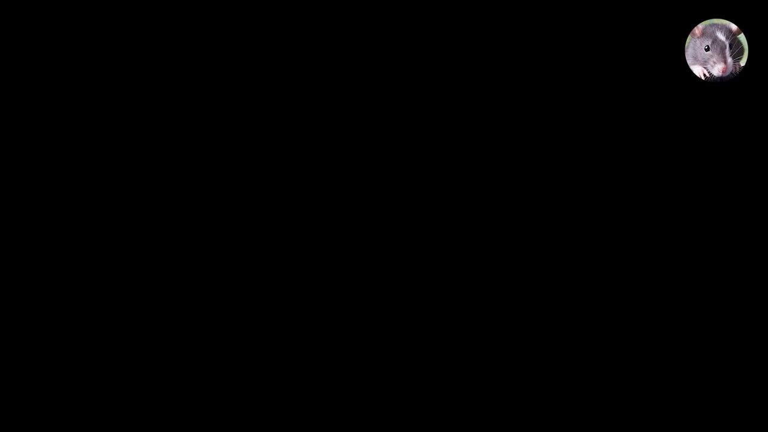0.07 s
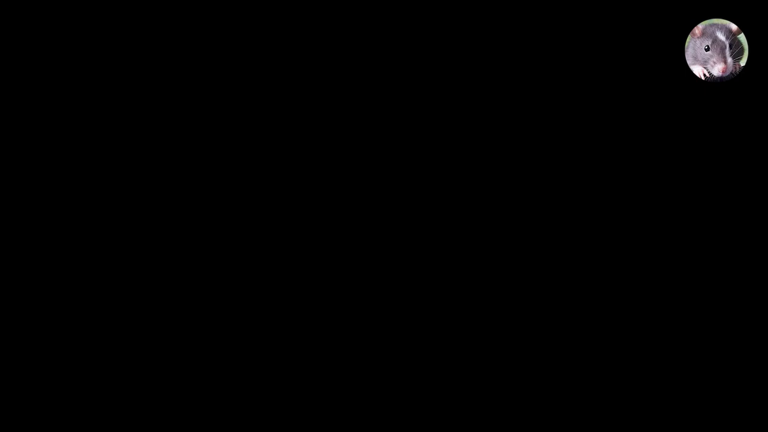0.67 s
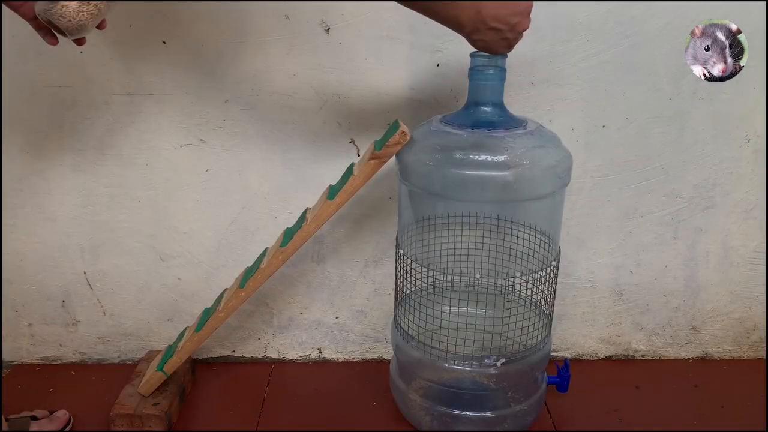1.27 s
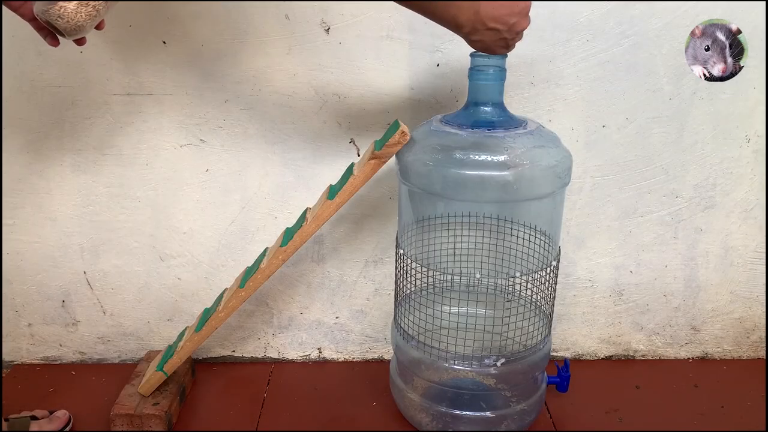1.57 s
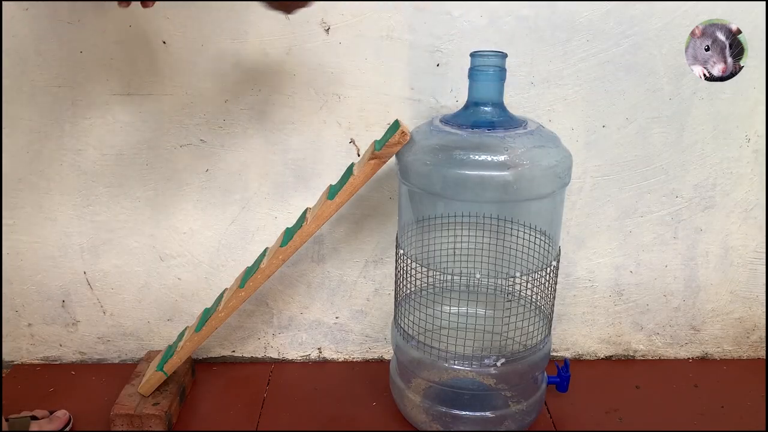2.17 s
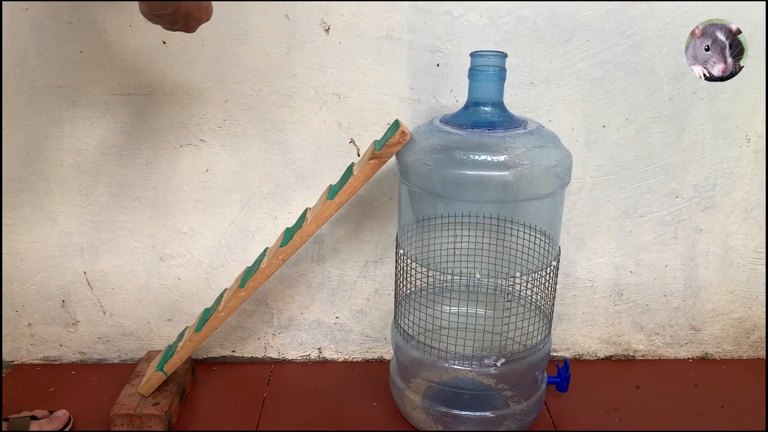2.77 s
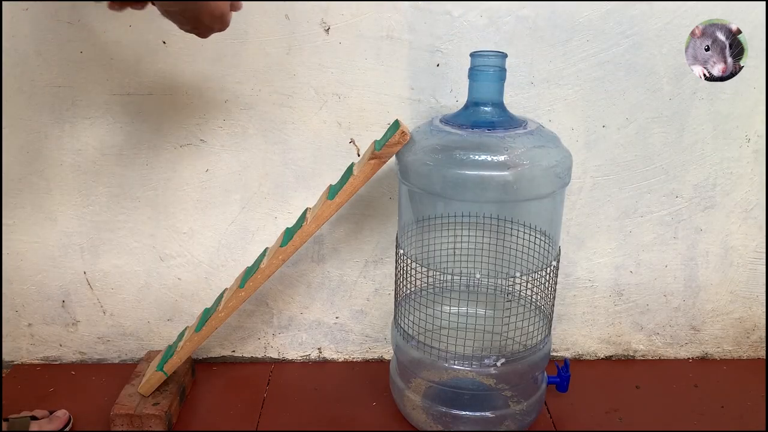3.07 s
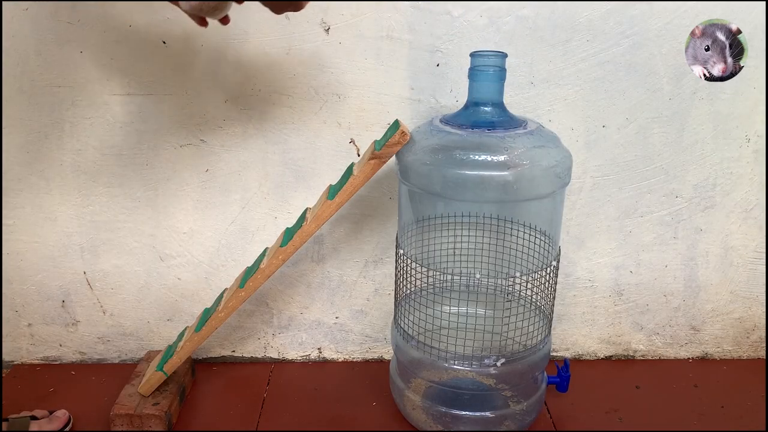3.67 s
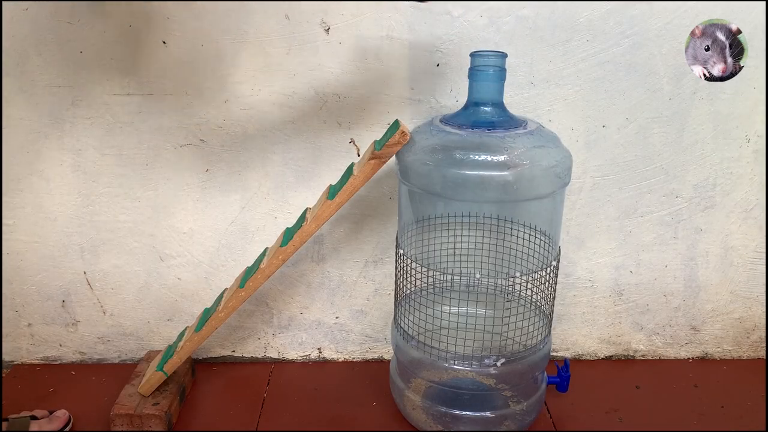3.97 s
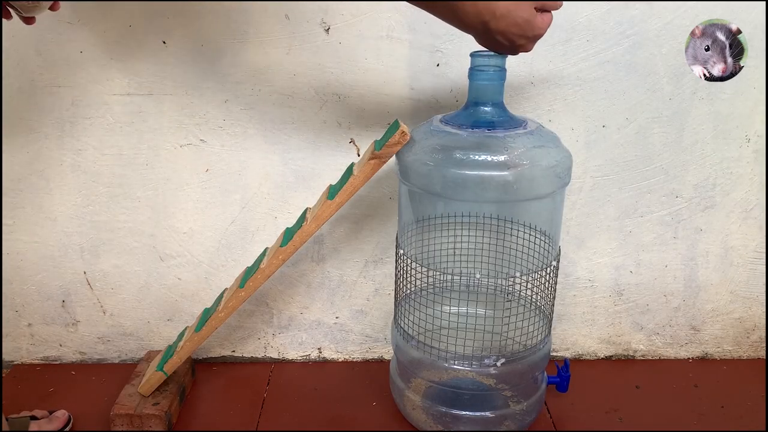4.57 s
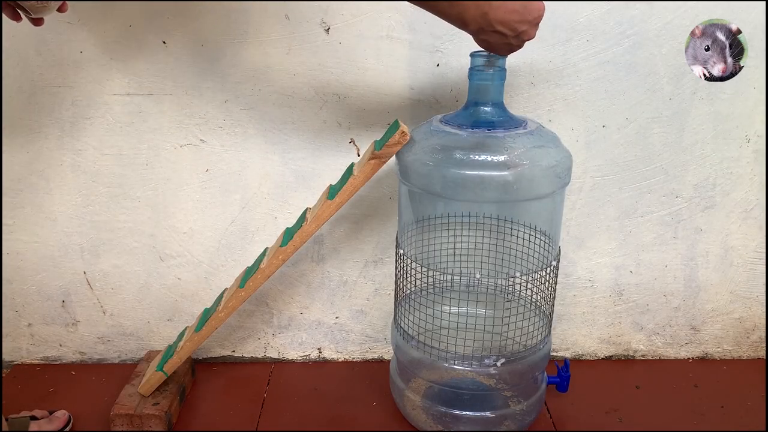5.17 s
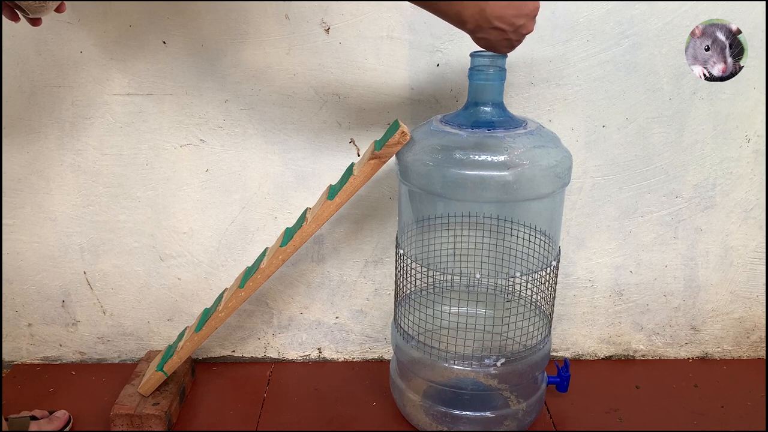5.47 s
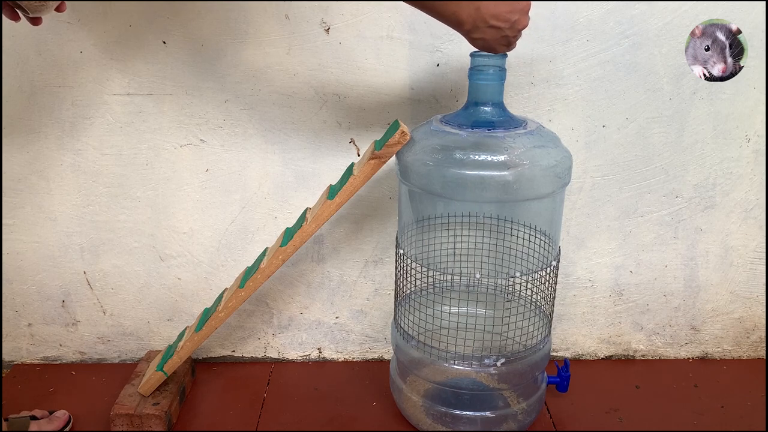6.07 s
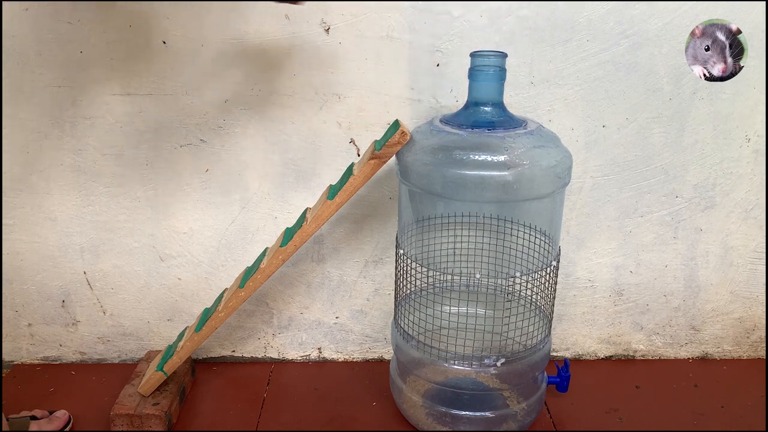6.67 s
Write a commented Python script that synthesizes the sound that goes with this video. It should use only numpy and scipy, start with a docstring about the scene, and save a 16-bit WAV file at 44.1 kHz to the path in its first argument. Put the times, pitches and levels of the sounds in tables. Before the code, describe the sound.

Dry grain trickles from a fist into a large empty plastic jug, pattering on the bottom and making the thin walls buzz and ring. The first pour tapers off, then kernels click and slide softly from one palm to the other. A second handful rattles in and ends with a few stray ticks. The sounds are close to the microphone, in a small room with a steady low rumble.

```python
"""Grain poured into a plastic jug

In a small room, two fistfuls of dry grain trickle through the neck of a big empty plastic water jug.
The kernels patter on its bottom, shaking the thin wall and the air inside. Between the pours, grain
slides from one palm into the other with a soft hiss, and stray kernels tick against the jug.
A faint clink comes first; a low rumble fills the room throughout."""
import sys
import numpy as np
from scipy import signal
from scipy.fft import rfft, irfft, next_fast_len
from scipy.io import wavfile

SR = 44100
rng = np.random.default_rng(int(sys.argv[2]) if len(sys.argv) > 2 else 0)


def store_wav(level_fs):
    """Save 16-bit WAV to argv[1]."""
    pcm = np.round(np.clip(np.atleast_2d(level_fs), -1, 1) * 32767)
    wavfile.write(sys.argv[1], SR, pcm.T.astype(np.int16))


N = 305172
START_S, TOP_HZ = 0.07, 16000

# Room tone: the rumble, the airy noise, the noise under hum and drone. Each row: Hz, dB per Hz.
RUMBLE_SPECTRUM = [(20, -43.5), (31, -20), (40, 3), (50, 0), (65, -7), (85, 1), (100, -7.5), (125, -27.5),
                   (200, -41.5), (400, -99)]
AIR_SPECTRUM = [(60, -14.5), (130, -15), (200, -1), (350, -4), (500, -5.5), (1000, -16), (2000, -28.5),
                (3000, -33), (4200, -40), (6500, -38), (10000, -42.5), (14400, -43), (15200, -68.5)]
LOW_SPECTRUM = [(80, -21.0), (140, -8.5), (350, -6.5), (1200, -34.0)]
# The pitch of the hum, and the room's resonances. Each row: centre in Hz, width in Hz, gain in dB.
HUM_MODES = [(160, 11, 0)]
ROOM_MODES = [(220.5, 14, 2), (279.5, 43, -0.5), (306.6, 19, -15)]
# Slow drift of the room tone. Each row: time in seconds, rumble in dB, hum in dB.
ROOM_TONE_DRIFT = [(0.35, -47, -45.5), (1.1, -46, -57), (2.8, -42.5, -49), (4.1, -42, -51),
                   (5.6, -44, -50.5), (6.3, -44.5, -54), (6.601, -47, -54)]
# The drone swells on one pitch. Each row: centre and half length in seconds, pitch in Hz, level in dB.
DRONE_SWELLS = [(2.222, 0.11, 220, -45.5), (3.009, 0.03, 231, -41), (3.366, 0.059, 228, -44),
                (3.422, 0.024, 274, -37), (3.43, 0.068, 322, -48)]
# Partials of the faint clink. Each row: pitch in Hz, level in dB, t60 in seconds.
CLINK_MODES = [(2150, 2.5, 0.099), (2650, 1, 0.12), (3120, 9, 0.14), (3270, 3.5, 0.14), (3478, 3, 0.15),
               (4120, 6, 0.12), (4650, 5, 0.16), (5545, -2, 0.18), (6363, 2, 0.16), (7343, -2, 0.25),
               (8339, -9, 0.32), (9700, -11, 0.35), (10300, -4, 0.38)]
# Grain slides in the hands. Each row: start, opening and emptying in seconds, hiss and palm in dB.
HAND_SLIDES = [(0.24, 0.011, 0.83, -75, -92), (2.58, 0.14, 0.46, -40.5, -53),
               (3.05, 0.029, 0.31, -57.5, -76), (3.22, 0.086, 0.091, -61.5, -70),
               (3.32, 0.26, 0.42, -43, -48), (3.818, 0.023, 0.33, -59, -57), (4.511, 0.033, 0.41, -68, -87)]
# The hollow of the palm. Each row: centre in Hz, width in Hz, gain in dB.
PALM_MODES = [(930, 290, 0), (1450, 400, -10)]
# Kernels click together in the hands. Each row: start in seconds, level in dB.
HAND_CLICKS = [(0.2437, -45), (0.324, -42.5), (2.311, -36), (2.369, -29.5), (2.42, -34), (2.429, -22.5),
               (2.623, -41), (3.998, -51)]
# Kernel on kernel, sliding and clicking. Each row: Hz, dB per Hz.
SLIDE_SPECTRUM = [(350, -12.5), (600, -15), (950, -12), (1500, -9), (3200, -6), (6600, -9), (10600, -16),
                  (13800, -19), (14700, -25), (16000, -84)]
CLICK_SPECTRUM = [(1200, -25), (3000, -5), (6500, 0.5), (10000, 2), (13800, 1.5), (15500, -18),
                  (16000, -38.5)]
# Single kernels land. Each row: start in seconds, level in dB, wall ring in dB relative to that level.
KERNEL_TAPS = [(0.4046, -17.5, -37.5), (0.439, -23, -24), (0.448, -13, -41), (0.481, -11.5, -23),
               (0.5475, -9.5, -23.5), (0.6804, -14, -18), (0.7263, -21.5, -33), (0.895, -6, -23),
               (0.969, -5.5, -30), (1.036, -5, -39), (1.177, -8, -37), (1.4117, -2.5, -31),
               (1.508, -8.5, -36), (1.545, -19, -35), (1.764, -9.5, -30), (1.791, -23, -42),
               (1.957, -23.5, -34), (2.0204, -14.5, -26), (2.068, -14.5, -38), (2.096, -14.5, -33.5),
               (2.1656, -25.5, -36), (2.233, -22.5, -34), (2.332, -35.5, -42), (2.369, -22.5, -41),
               (4.7932, -28.5, -14), (4.808, -17.5, -20), (4.885, -16.5, -23.5), (4.901, -18.5, -29),
               (4.938, -17.5, -33), (4.952, -22.5, -25), (4.966, -14, -28), (4.987, -13, -33),
               (5.009, -22, -29), (5.0463, -17.5, -18), (5.119, -4.5, -23.5), (5.24, -15, -34),
               (5.275, -18.5, -27), (5.3157, -12, -31), (5.791, -22.5, -37), (5.9907, -8, -38),
               (6.171, -30.5, -26), (6.1971, -11, -25), (6.2697, -11, -39), (6.344, -14, -40),
               (6.416, -19.5, -22), (6.433, -20, -26), (6.504, -23, -32.5), (6.5816, -20, -35)]
# Clumps land. Each row: start in seconds, level in dB, settling time of the rebounds in seconds.
KERNEL_CLUMPS = [(0.5865, -8.5, 0.03), (1.4245, -7, 0.05), (1.775, -6, 0.027), (1.856, -12, 0.01),
                 (5.0642, -14, 0.09), (5.105, -11, 0.079), (5.166, -9, 0.025), (5.752, -15, 0.022),
                 (5.9298, -11.5, 0.08), (6.6127, -24.5, 0.18)]
# A squarely struck wall rings on. Each row: pitch in Hz, level in dB, t60 in seconds.
WALL_MODES = [(1753, -1.5, 0.22), (2750, -5, 0.12)]
# Kernel on plastic: the thin wall, the flexing bottom, a glancing click. Each row: Hz, dB per Hz.
WALL_SPECTRUM = [(400, -39), (700, -14.5), (1100, -18.5), (1650, -6.5), (2400, -5), (3900, -2),
                 (4750, -2.5), (5150, -5.5), (6200, -5.5), (7500, -10.5), (8150, -5.5), (8800, -11.5),
                 (9900, -12), (11000, -11), (13300, -10.5), (14400, -13.5), (15100, -43), (16000, -49)]
BOTTOM_SPECTRUM = [(120, -19), (250, -8), (340, -1.5), (400, 5.5), (470, -4.5), (530, 1.5), (590, 2),
                   (700, -10), (1100, -14.5), (1400, 8.5), (1650, -8.5), (2200, -30.5)]
GLANCE_SPECTRUM = [(1000, -27.0), (2200, 3.0), (4000, 0.0), (12000, -4.5), (16000, -9.5)]
# Air and wall resonances of the jug. Each row: centre in Hz, width in Hz, gain in dB.
JUG_MODES = [(272, 10, 0), (396, 18, 3.5), (515, 16, 2), (543, 18, 5.5), (578, 12, 2), (884, 22, 1),
             (1232, 22, 6), (1256, 18, -1), (1467, 40, 3), (1753, 20, 3.5), (1950, 50, 0), (2076, 30, 2.5),
             (2240, 70, 1), (2438, 50, 8), (3010, 150, 3.5), (3150, 22, 1), (3838, 90, 1), (4150, 70, -1),
             (4720, 110, 0)]
# The fist lets go: four gushes and a last trickle, then two gushes for the second handful.
# Each row: start, opening and emptying in seconds, fullest level in dB.
FIST_GUSHES = [(0.44, 0.54, 0.86, -21.5), (1.32, 0.1, 0.91, -25.5), (1.58, 0.17, 0.44, -28.5),
               (1.993, 0.075, 0.35, -33), (2.22, 0.054, 0.48, -43.5), (4.93, 0.62, .85, -21),
               (5.918, 0.061, 0.94, -28.5)]
# Kernels glance off a stiff spot. Each row: start in seconds, level in dB, pitch in Hz,
# ring t60 and attack in seconds, click in dB relative to the level.
GLANCING_HITS = [(2.567, -20, 2383, 0.034, 0.0035, -9), (4.859, -19.5, 3000, 0.019, 0.0005, -5.5),
                 (6.612, -33, 1930, 0.015, 0.00066, 6), (6.663, -27.5, 3180, 0.017, 0.001, -7.5),
                 (6.7306, -23.5, 3320, 0.015, 0.0008, 1)]
# Reverberation of the small room. Each row: frequency in Hz, t60 in seconds.
ROOM_DECAY = [(200, 0.16), (2000, 0.2), (6000, 0.39), (14000, 0.024)]
# Likeness of the two microphone channels. Each row: frequency in Hz, likeness from 0 to 1.
MIC_LIKENESS = [(50, 0.96), (200, 0.86), (400, 0.48), (800, 0.054), (2000, 0.2), (3500, 0.29), (5000, 0.14),
                (7200, 0.075), (9000, 0.41), (10500, 1), (15000, 1)]
# Balance at the microphones. Each row: frequency in Hz, left minus right in dB.
MIC_BALANCE = [(60, -3.5), (250, -2.5), (550, 1.5), (1000, 0), (3000, 0.8), (6500, -2.5), (8300, -2),
               (10000, 0)]


def amp(db):
    """Decibels to gain."""
    return 10 ** (np.asarray(db) / 20)


def unit(x):
    """Scale to rms 1."""
    return x / np.sqrt(np.mean(x ** 2) + 1e-20)


def along(points, hz):
    """Read (Hz, value) points along a log frequency axis."""
    freqs, values = np.transpose(points)
    return np.interp(np.log(hz + 1), np.log(freqs + 1), values)


def add(track, s, sound):
    """Mix a sound into the track at s seconds."""
    part = track[..., round(s * SR):][..., :sound.shape[-1]]
    part += sound[..., :part.shape[-1]]


def filtered(x, response):
    """Pass x through a complex frequency response."""
    size = next_fast_len(x.shape[-1] + SR // 2)
    return irfft(rfft(x, size) * response(np.fft.rfftfreq(size, 1 / SR)), size)[..., :x.shape[-1]]


def coloured(x, spectrum, size=4096):
    """Pass x through a causal filter with a (Hz, dB) spectrum."""
    gain = amp(along(spectrum, np.fft.rfftfreq(size, 1 / SR)))
    cepstrum = irfft(np.log(gain + 1e-6))
    cepstrum[1:size // 2] *= 2
    cepstrum[size // 2 + 1:] = 0
    impulse = irfft(np.exp(rfft(cepstrum)))
    return signal.oaconvolve(x, impulse[None], axes=1)[:, :x.shape[1]]


def resonant(x, modes):
    """Pass x through parallel (Hz, width, dB) resonances."""
    return filtered(x, lambda f: sum(amp(db) * 1j * f * width / (hz * hz - f * f + 1j * f * width)
                                     for hz, width, db in modes))


def noise(spectrum):
    """Stereo noise of rms 1 with a (Hz, dB) spectrum."""
    return unit(filtered(rng.standard_normal((2, N)), lambda hz: amp(along(spectrum, hz))))


def hail(rate, spread_db):
    """Random impacts at a rate per second, of scattered size and unit mean power."""
    chance = np.clip(rate / SR, 1e-5, 1) * np.ones(N)
    size = unit(amp(spread_db * np.clip(rng.standard_normal(N), -2, 2)))
    return (rng.random(N) < chance) * size * rng.choice([-1, 1], N) / np.sqrt(chance)


def gush(start, opening, emptying, rise, fall):
    """Gain of a flow that grows as the hand opens, then tapers until it runs dry."""
    t = np.arange(N) / SR - start
    spent = np.clip((t - opening) / emptying, 0, 1)
    return np.clip(t / opening, 0, 1) ** rise * np.abs(np.cos(np.pi / 2 * spent)) ** fall


def room_tone(drone_db=-52, air_db=-50.5):
    """All around the microphones: rumble, a wavering hum, air, and a drone in the room's resonances."""
    t = np.arange(N) / SR
    times, *levels = np.transpose(ROOM_TONE_DRIFT)
    rumble_db, hum_db = (np.interp(t, times, level) for level in levels)
    low = noise(LOW_SPECTRUM)
    hum = amp(hum_db) * unit(resonant(low, HUM_MODES))
    drone = amp(drone_db) * unit(resonant(low, ROOM_MODES))
    swells = sum(amp(db) * np.exp(-((t - s) / half) ** 2) * np.sin(2 * np.pi * hz * t)
                 for s, half, hz, db in DRONE_SWELLS)
    return amp(rumble_db) * noise(RUMBLE_SPECTRUM) + hum + drone + swells + amp(air_db) * noise(AIR_SPECTRUM)


def clink(level_db=-59, noise_db=-51, noise_t60=0.46):
    """Something small and hard rings faintly and dies away."""
    track, t = np.zeros((2, N)), np.arange(SR // 2) / SR
    for hz, db, t60 in CLINK_MODES:
        partial = np.sin(2 * np.pi * (hz * t + rng.random((2, 1))))
        add(track, START_S, amp(level_db + db - 60 * t / t60) * partial)
    add(track, START_S, amp(noise_db - 60 * t / noise_t60) * rng.standard_normal((2, len(t))))
    return track


def palm_slides(level_db=1.0):
    """Kernels slide over each other in tiny dense ticks, coloured by the cupped palm."""
    ticks = lambda: np.array([hail(4000, spread_db=1.5) for channel in range(2)])
    hiss = unit(coloured(ticks(), SLIDE_SPECTRUM))
    hollow = unit(resonant(resonant(ticks(), PALM_MODES), PALM_MODES))
    track = np.zeros((2, N))
    for s, opening, emptying, hiss_db, palm_db in HAND_SLIDES:
        flow = gush(s, opening, emptying, rise=0.48, fall=5.15)
        track += flow * (amp(hiss_db) * hiss + amp(palm_db) * hollow)
    return amp(level_db) * track


def kernel_clicks(level_db=-9, attack_s=0.0011, click_t60=0.063):
    """Kernel on kernel in the hand: a dry, bright click without the jug's ring."""
    track, t = np.zeros((2, N)), np.arange(SR // 6) / SR
    for s, db in HAND_CLICKS:
        envelope = amp(db + level_db - 60 * t / click_t60) * np.minimum(t / attack_s, 1)
        add(track, s, envelope * rng.standard_normal((2, len(t))))
    return coloured(track, CLICK_SPECTRUM)


def buzz_envelope(power, burst_s, wall_t60, wall_db, cavity_t60, cavity_db):
    """Each impact shakes the thin wall briefly, then echoes around inside the jug."""
    t = np.arange(SR // 4) / SR
    burst = np.exp(-(t / burst_s) ** 2)
    fade = (burst + amp(wall_db - 60 * t / wall_t60) + amp(cavity_db - 60 * t / cavity_t60)) ** 2
    return np.sqrt(np.abs(signal.oaconvolve(power, fade / fade.sum())[:N]))


def jug(buzz, wall_db, modes_db, bottom_db=-18.5, damping_db_per_s=0.5):
    """The jug's thin wall, its resonances, and its flexing bottom, which quietens as grain gathers."""
    shake = lambda: buzz * rng.standard_normal((2, N))
    wall = amp(wall_db) * unit(coloured(shake(), WALL_SPECTRUM))
    bottom_gain = amp(bottom_db - damping_db_per_s * np.arange(N) / SR)
    bottom = bottom_gain * unit(coloured(shake(), BOTTOM_SPECTRUM))
    resonances = amp(modes_db) * unit(resonant(shake(), JUG_MODES))
    return np.sqrt(np.mean(buzz ** 2)) * (wall + bottom + resonances)


def landings(clump_db=3, tap_db=10, scatter_s=0.0059, per_clump=3):
    """Kernels strike the bottom singly or in tight clumps; the single ones leave the wall ringing."""
    power, ringing, t = np.zeros(N), np.zeros((2, N)), np.arange(SR // 3) / SR
    for s, db, ring_db in KERNEL_TAPS:
        power[round(s * SR)] += amp(db + tap_db) ** 2
        for hz, mode_db, t60 in WALL_MODES:
            partial = np.sin(2 * np.pi * hz * t + rng.normal(0, 0.39, (2, 1)))
            add(ringing, s, amp(db + ring_db + mode_db - 60 * t / t60) * partial)
    for s, db, _ in KERNEL_CLUMPS:
        for late in scatter_s * np.linspace(0, 1, per_clump) * rng.uniform(0.89, 0.97, per_clump):
            power[round((s + late) * SR)] += amp(db + clump_db) ** 2
    buzz = buzz_envelope(power, burst_s=0.0042, wall_t60=0.11, wall_db=-8.5,
                         cavity_t60=0.21, cavity_db=-1)
    return jug(buzz, wall_db=3.0, modes_db=-4.5) + ringing


def grain_flow(rebound_db=-16):
    """Strength of the patter: the gushes, and the rebounds that settle after each clump."""
    t = np.arange(N) / SR
    falling = sum((amp(db) * gush(s, opening, emptying, rise=0.5, fall=2.7)) ** 2
                  for s, opening, emptying, db in FIST_GUSHES)
    rebounds = sum(((t > s) * amp(db + rebound_db) * np.exp(-np.abs((t - s) / settle))) ** 2
                   for s, db, settle in KERNEL_CLUMPS)
    return np.sqrt(falling + rebounds)


def spot_rings(hits, low_hz, high_hz, ring_t60):
    """Every landing spot rings briefly, with its own pitch and its own place between the channels."""
    at, t = np.flatnonzero(hits), np.arange(SR // 40) / SR
    pitch, place = rng.random((N // 10, 2))[:len(at)].T
    hz = low_hz * (high_hz / low_hz) ** pitch[:, None]
    fade = amp(-60 * t / ring_t60)
    waves = np.sin(2 * np.pi * hz * t) * fade / np.linalg.norm(fade)
    index = (at[:, None] + np.arange(len(t))).ravel()
    channel = lambda share: np.bincount(index, (waves * (hits[at] * share)[:, None]).ravel(), N)[:N]
    pair = np.array([channel(np.cos(2 * np.pi * place)), channel(np.sin(2 * np.pi * place))])
    return coloured(2 * pair, [(13000, 0.5), (15000, -32.5)])


def pours():
    """A thicker stream is louder and denser; all hits buzz the jug, the harder ones snap and ring."""
    flow = grain_flow()
    fullness = flow / flow.max()
    soft_hits = flow * hail(700 + 1600 * fullness, spread_db=4.0)
    hard_hits = flow * hail(500 + 1000 * fullness, spread_db=2.6)
    buzz = buzz_envelope((soft_hits ** 2 + hard_hits ** 2) / 2, burst_s=0.002,
                         wall_t60=0.064, wall_db=-0.5, cavity_t60=0.15, cavity_db=-11)
    snap_gain = amp(-9.5) * np.sqrt(np.mean(flow ** 2))
    snap = snap_gain * unit(coloured(hard_hits * rng.standard_normal((2, N)), WALL_SPECTRUM))
    wall_rings = amp(-5) * spot_rings(hard_hits, low_hz=1997, high_hz=4820, ring_t60=0.04)
    kernel_rings = amp(-9) * spot_rings(hard_hits, low_hz=5613, high_hz=10740, ring_t60=0.056)
    return jug(buzz, wall_db=-2.5, modes_db=-10.0) + snap + wall_rings + kernel_rings


def glancing_pings(ring_db=-2, click_t60=0.058, detune=0.06):
    """A glancing kernel clicks and rings on three close pitches, each hit with its own attack."""
    ringing, clicks, t = np.zeros((2, N)), np.zeros((2, N)), np.arange(SR // 8) / SR
    for s, db, hz, t60, attack, click_db in GLANCING_HITS:
        rise = np.minimum(t / attack, 1)
        partials = [np.sin(2 * np.pi * (hz * (1 + k * detune) * t + rng.random((2, 1)))) / (1 + abs(k))
                    for k in (-1, 0, 1)]
        add(ringing, s, amp(db + ring_db - 60 * t / t60) * rise * sum(partials))
        click_fade = amp(db + click_db - 60 * np.maximum(t - attack, 0) / click_t60)
        add(clicks, s, click_fade * rise * rng.standard_normal((2, len(t))))
    return ringing + coloured(clicks, GLANCE_SPECTRUM)


def room_reverb(x, stretches=12, delay_s=0.005):
    """Bare walls close by answer with a short, smooth reverberation; the top treble dies first."""
    hz, t, spectra = signal.stft(rng.standard_normal((stretches, 2, SR // 3)), SR, nperseg=256)
    decay = amp(-60 * t / along(ROOM_DECAY, hz)[:, None])
    tails = signal.istft(spectra * decay, SR, nperseg=256)[1]
    wet = np.zeros((2, N))
    for part, tail in zip(np.array_split(np.arange(N), stretches), tails):
        tail = tail / np.sqrt(np.sum(tail ** 2) / 2 + 1e-20)  # energy 1 a channel
        add(wet, part[0] / SR + delay_s, signal.fftconvolve(x[:, part], tail, axes=1))
    return wet


def scene():
    """Jug and hands near the microphones, with the reverberation and room tone behind them."""
    patter = pours() + landings()
    ticks = glancing_pings() + clink() + kernel_clicks()
    sliding = palm_slides()
    reverb = room_reverb(amp(-11.5) * patter + amp(-5.0) * ticks + amp(-5.5) * sliding)
    return patter + ticks + sliding + reverb + room_tone()


def record(dry):
    """A stereo microphone pair: the channels share bass and top treble, the left treble a little late."""
    lag_s = 0.000296
    width = lambda hz: np.arccos(np.clip(along(MIC_LIKENESS, hz), -1, 1)) / 2
    mid, side = filtered(dry, lambda hz: np.array([np.cos(width(hz)), np.sin(width(hz))]))
    pair = np.array([mid + side, mid - side]) * (np.arange(N) / SR > START_S)
    treble_phase = lambda hz: np.pi * np.maximum(hz * lag_s - 1, 0)
    left = lambda hz: amp(along(MIC_BALANCE, hz) / 2) * np.exp(-1j * treble_phase(hz))
    return filtered(pair, lambda hz: np.array([left(hz), 1 / left(hz)]) * (hz < TOP_HZ))


dry = scene()
out = record(dry)
store_wav(out)
```